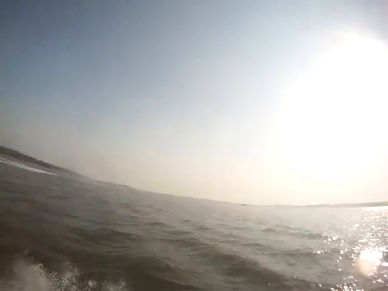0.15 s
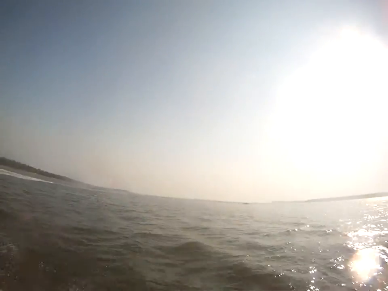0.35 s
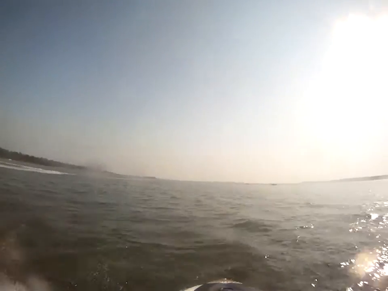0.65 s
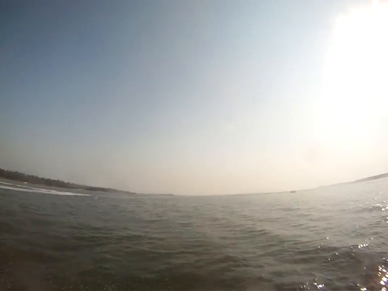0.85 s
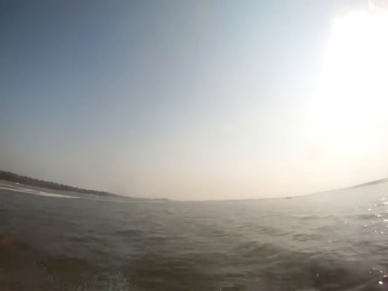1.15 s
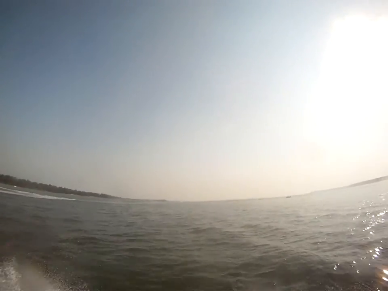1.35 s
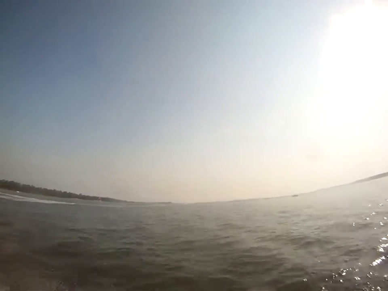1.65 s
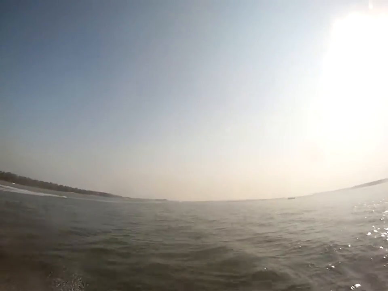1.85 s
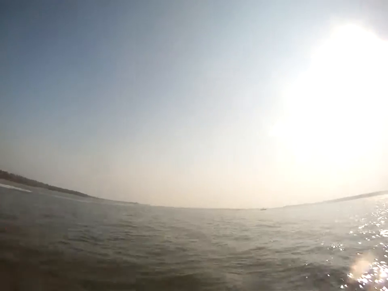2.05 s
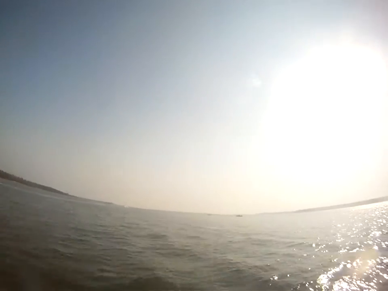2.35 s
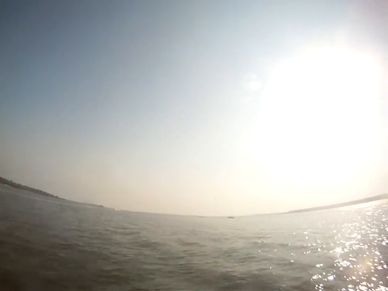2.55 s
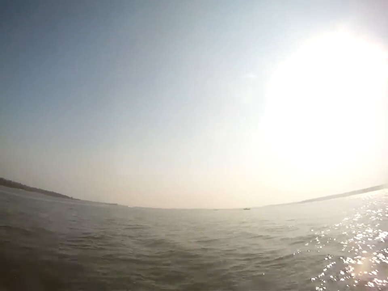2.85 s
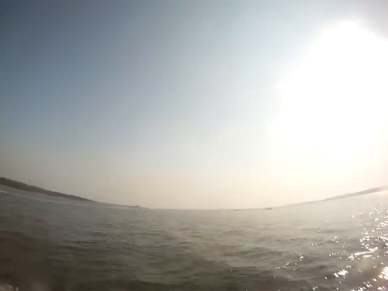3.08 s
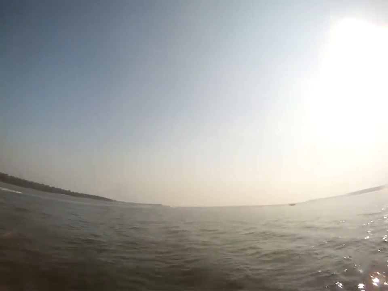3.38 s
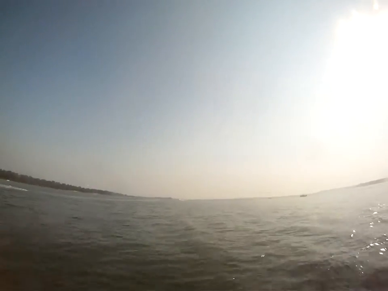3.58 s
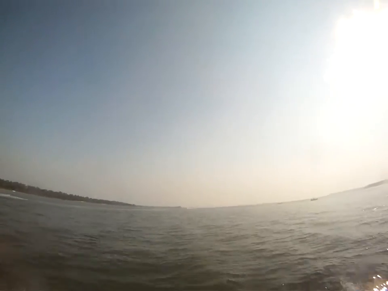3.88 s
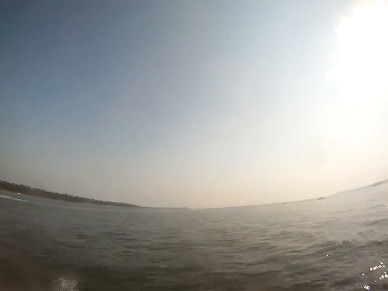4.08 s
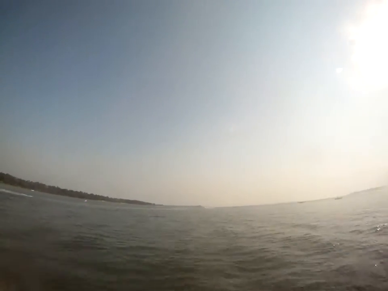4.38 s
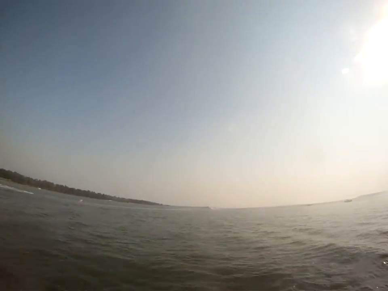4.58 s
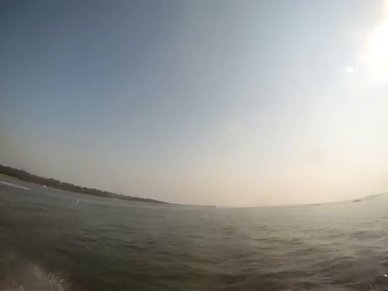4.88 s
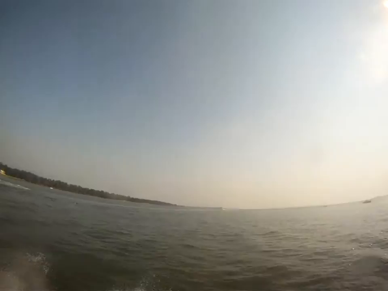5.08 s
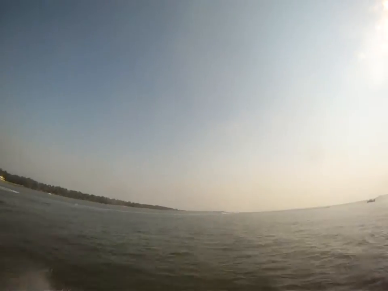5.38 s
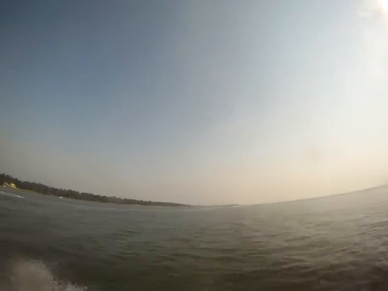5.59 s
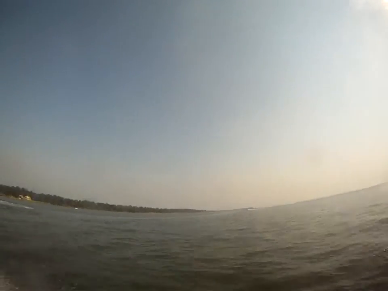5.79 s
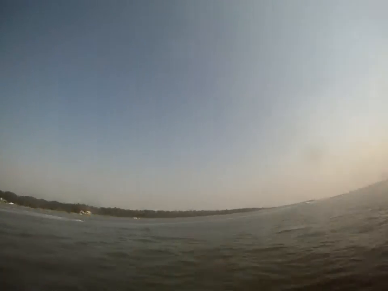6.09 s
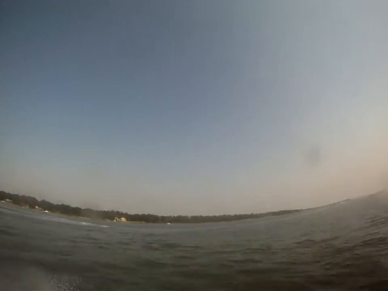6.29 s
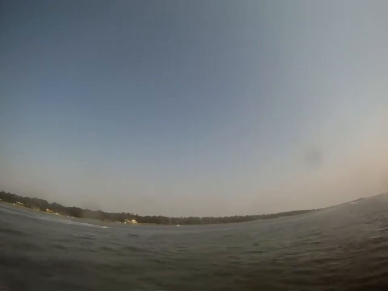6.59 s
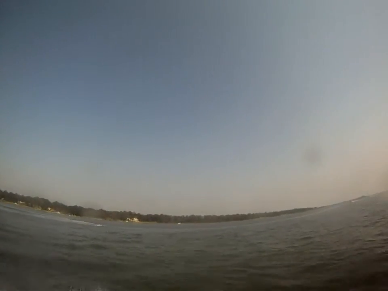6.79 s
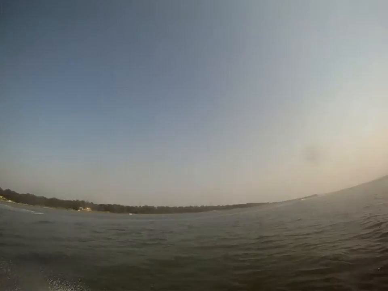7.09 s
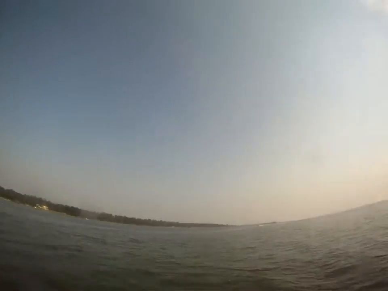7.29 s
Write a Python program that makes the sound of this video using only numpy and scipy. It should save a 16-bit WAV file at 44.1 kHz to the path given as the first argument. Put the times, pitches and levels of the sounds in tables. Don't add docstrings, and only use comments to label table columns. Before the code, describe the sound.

Steady low engine drone aboard a small watercraft on open water, with muffled wave thumps, rushing wash, gritty spray hiss and wind buffeting.

```python
import sys
import numpy as np
from scipy import signal
from scipy.fft import rfft, irfft, next_fast_len
from scipy.io import wavfile

SR = 44100
rng = np.random.default_rng(int(sys.argv[2]) if len(sys.argv) > 2 else 0)


def waveform_to_disk(signal):
    frames = np.transpose(np.atleast_2d(signal))
    scaled = np.clip(frames, -1, 1) * 32767
    samples = np.round(scaled).astype(np.int16)
    wavfile.write(sys.argv[1], SR, samples)


def to_linear_factor(level_db):
    exponent = np.asarray(level_db, float) / 20
    return 10 ** exponent


N = 328104

# time in seconds, firing rate in Hz, hum level in dB.
ENGINE_RUN = [(0, 180.4, -15.5), (.85, 181.7, -16), (1.2, 182.4, -16), (1.9, 181.4, -16.5),
              (2.44, 182, -16.5), (2.73, 192.3, -15.5), (3.04, 198.7, -17.5), (3.68, 198.0, -16),
              (3.8, 200.6, -20), (4.1, 198.5, -17), (4.56, 198.2, -18.8), (5.3, 200, -17),
              (5.52, 199.8, -20), (6.1, 200.2, -17.5), (6.45, 199.2, -13), (6.9, 199.4, -17),
              (7.2, 200.7, -15.5), (7.44, 200.3, -14.5)]
# time of the main push in seconds, peak in dB, pitch in Hz, polarity (1 or -1), gain duck
# in dB.
WAVE_SLAMS = [(.017, -10, 140, 1, 1.5), (.279, -10, 130, -1, 1.2), (.379, -10, 130, -1, 1.2),
              (1.008, -12, 110, -1, 1.2), (1.272, -14, 86, 1, 1.5), (2.730, -11, 70, 1, 1.5),
              (3.281, -11, 110, -1, 1.5), (3.499, -11, 110, -1, 3.0), (3.647, -11, 120, 1, 1.5),
              (3.899, -6, 105, -1, 5.5), (4.221, -5, 115, -1, 6.5), (4.358, -8, 160, 1, 1.5),
              (4.611, -10, 130, 1, 1.2), (5.036, -8, 110, 1, 2.5), (5.465, -7, 70, -1, 5.0),
              (6.167, -9, 140, 1, 1.2), (6.345, -7, 100, -1, 6.5), (6.683, -12, 100, 1, 1.5),
              (6.849, -6, 75, 1, 3.5), (7.024, -11, 75, 1, 2.5), (7.117, -10, 110, -1, 1.2),
              (7.218, -10, 90, 1, 1.2)]


def engine():
    # multiple of the firing rate, level in dB under the hum.
    overtones = [(2, -30), (3, -35)]
    firing_hz, hum_db = in_time(ENGINE_RUN)
    phase = 2 * np.pi * np.cumsum(firing_hz + 0.4 * drift(5.7)) / SR
    tone = np.sin(phase)
    for multiple, level_db in overtones:
        overtone_db = level_db + 2 * housing_db(multiple * firing_hz) + 5.9 * drift(2.8)
        overtone_phase = round(multiple) * phase + 0.62 * drift(3.5)
        tone += to_linear_factor(overtone_db) * np.sin(overtone_phase)
    return np.sqrt(2) * to_linear_factor(hum_db + 0.88 * drift(16.0)) * tone


def slams():
    out, t = np.zeros(N), np.arange(N) / SR
    for s, peak_db, pitch_hz, polarity, duck_db in WAVE_SLAMS:
        near = slice(max(round((s - .03) * SR), 0), round((s + .03) * SR))
        cycles = (t[near] - s) * pitch_hz
        envelope = np.exp(-((cycles - .2) / .55) ** 2)
        out[near] += np.sign(polarity) * to_linear_factor(peak_db) * np.cos(2 * np.pi * cycles) * envelope
    return out


def drumming(faster_hz, keel_db):
    # frequency in Hz, level in dB per Hz.
    spectrum = [(40, -7), (65, -5.5), (90, -0.5), (150, -3), (195, -8.5), (250, -14.5), (350, -25)]
    level_db = -24 + 0.13 * faster_hz + keel_db
    return to_linear_factor(level_db) * turbulence(spectrum, shared_db=-0.2, own_db=0.7, rate=10.0, count=2)


def boom(faster_hz, bow_db, wind_db):
    # frequency in Hz, level in dB per Hz.
    spectrum = [(140, -7), (195, -5), (235, -3.5), (320, -9), (400, -24), (550, -25)]
    level_db = -26 - 0.0035 * faster_hz + bow_db - 0.43 * wind_db
    return to_linear_factor(level_db) * turbulence(spectrum, shared_db=1.7, own_db=1.6, rate=8.6, count=2)


def wash(faster_hz, wake_db, bow_db):
    # frequency in Hz, level in dB per Hz.
    spectrum = [(220, -24), (330, -1.5), (400, -0.3), (560, -3), (680, -8.5), (900, -20.5), (1300, -29.5)]
    level_db = -28 + 0.0685 * faster_hz + 0.59 * wake_db + 0.17 * bow_db
    return to_linear_factor(level_db) * turbulence(spectrum, shared_db=.9, own_db=0.4, rate=8.6, count=3)


def spray(sheet_db, wind_db):
    # frequency in Hz, level in dB per Hz.
    spectrum = [(300, -57), (700, -17), (1000, -10.5), (1520, -10.5), (2500, -6), (3600, -10.5),
                (4250, -16), (5300, -18), (5900, -24), (6600, -38), (7500, -60)]
    level_db = -32 + sheet_db + 0.46 * wind_db
    top_db = 0.55 * wind_db + 0.25 * sheet_db
    hiss = turbulence(spectrum, shared_db=.75, own_db=.45, rate=28.0, count=6, top_db=top_db)
    return to_linear_factor(level_db) * hiss


def buffet(wind_db):
    # frequency in Hz, level in dB per Hz.
    spectrum = [(10, -30), (20, 5), (40, 6.5), (60, 6), (85, 2), (130, -37)]
    return to_linear_factor(-25 + wind_db) * turbulence(spectrum, shared_db=1.7, own_db=0.0, rate=8.8, count=2)


def headwind():
    # time in seconds, strength in dB over calm.
    strength = [(0, 2), (.4, -3), (1.7, 0), (3.0, -1.5), (4.3, 0), (5.0, 1.5), (6.0, 3), (6.9, 4),
                (7.44, 2)]
    return in_time(strength)[0]


def swells():
    # centre in seconds, length in seconds, strength in dB, bow share (0 keel to 1 bow).
    meetings = [(.7, 0.23, 3.5, 0.74), (1.2, .3, 2.5, 0.24), (1.45, .15, 2.2, 1), (1.9, 0.12, 4.9, 0.52),
                (2.7, 0.24, 1.1, .1), (3.25, 0.13, 2.2, .1), (3.6, 0.28, 6.1, .9), (4.1, 0.36, 6.4, 0.34),
                (4.55, 0.42, 7.8, 0.67), (5.0, 0.14, 2.3, 0.41), (5.5, 0.16, 5.8, .05),
                (5.85, 0.16, 2.4, 0.89), (6.25, .2, 1.2, 0.54), (6.8, 0.14, 2.6, .2),
                (7.25, 0.24, 5.6, 0.64)]
    s, length, strength_db, bow = np.transpose(meetings)
    keel_db = bumps(s, length, strength_db * (1 - bow))
    bow_db = bumps(s, length, strength_db * bow)
    return keel_db, bow_db


def sheets():
    # centre in seconds, length in seconds, swing in dB (below zero: hull lifts clear).
    throws = [(0.26, 0.044, 2.5), (0.518, 0.2, 3), (0.817, .07, -1.5), (1.038, 0.13, 2.5),
              (1.144, 0.025, 1.5), (1.225, 0.035, -1.5), (1.343, 0.063, 3.5), (1.657, 0.11, -4),
              (2.2, 0.15, .5), (2.757, 0.053, 2.5), (3.2, 0.16, 2.5), (3.52, 0.13, 3), (3.68, 0.12, 1.5),
              (4.046, 0.25, 2), (4.36, .04, 1.5), (4.6, 0.17, 1.5), (4.805, 0.038, 1.5), (5.0, .05, -0.5),
              (5.127, 0.039, 2.5), (5.293, .15, 1), (5.88, 0.13, 2), (6.102, 0.05, 1), (6.272, .1, 2.5),
              (6.587, 0.15, 2), (6.82, .06, 0.5), (7.1, .1, .5), (7.4, 0.17, 2)]
    s, length, swing_db = np.transpose(throws)
    return bumps(s, length, swing_db), bumps(s, 1.3 * length, swing_db)


def housing_db(hz):
    # centre in Hz, width in Hz, boost in dB.
    modes = [(611, 56, 3), (1205, 140, 1.5), (2260, 500, 1), (2477, 190, -4.5), (3033, 430, 4.5),
             (3290, 310, 2), (3690, 180, -4), (3860, 160, 0.5), (4856, 780, 7)]
    return sum(boost_db / (1 + (2 * (hz - peak_hz) / width) ** 2) for peak_hz, width, boost_db in modes)


def turbulence(spectrum, shared_db, own_db, rate, count, top_db=0):
    size = next_fast_len(N)
    hz = np.maximum(np.arange(size // 2 + 1) * SR / size, 1)
    points = np.array(spectrum)
    colour_db = np.interp(np.log(hz), np.log(points[:, 0]), points[:, 1], left=-90, right=-90)
    noise = rfft(rng.standard_normal(size)) * to_linear_factor(colour_db + housing_db(hz))
    place = np.interp(np.log(hz), np.log(points[[1, -2], 0]), [0, count - 1])
    together, out = drift(rate), np.zeros(N)
    for k in range(count):
        share = np.clip(1 - np.abs(place - k), 0, 1)
        band = irfft(noise * share, size)[:N]
        tilt_db = top_db * (k / (count - 1)) ** 3
        out += band * to_linear_factor(shared_db * together + own_db * drift(rate) + tilt_db)
    return rms_one(out)


def drift(rate):
    r = np.exp(-80 * np.pi * rate / SR)
    noise = rng.standard_normal(N // 40 + 2002)
    slow = signal.lfilter([1], [1, -2 * r, r * r], noise)[2000:]
    return np.interp(np.arange(N) / 40, np.arange(len(slow)), rms_one(slow))


def bumps(s, length, swing_db):
    t = np.arange(0, N + 64, 64) / SR
    total = sum(d * np.exp(-((t - a) / w) ** 2) for a, w, d in zip(s, length, swing_db))
    return np.interp(np.arange(N) / SR, t, total)


def in_time(rows):
    s, *columns = np.transpose(rows)
    return [np.interp(np.arange(N) / SR, s, c) for c in columns]


def rms_one(x):
    return x / np.sqrt(np.mean(x ** 2) + 1e-20)


def scene():
    faster_hz = in_time(ENGINE_RUN)[0] - 181
    wind_db = headwind()
    keel_db, bow_db = swells()
    sheet_db, wake_db = sheets()
    hull = drumming(faster_hz, keel_db) + boom(faster_hz, bow_db, wind_db)
    water = wash(faster_hz, wake_db, bow_db) + spray(sheet_db, wind_db)
    return (engine() + slams() + hull + water + buffet(wind_db))[None]


def gain_control():
    attack_s, release_s = .0015, .14
    t, gain_db = np.arange(N) / SR, np.zeros(N)
    for s, peak_db, pitch_hz, polarity, duck_db in WAVE_SLAMS:
        since = np.maximum(t - s - 3 * attack_s, 0)
        gain_db -= duck_db * (1 - np.exp(-since / attack_s)) * np.exp(-since / release_s)
    return to_linear_factor(gain_db)


def held_samples(x):
    slow = signal.resample_poly(x, 160, 147, axis=1)[:, ::4]
    return signal.resample_poly(np.repeat(slow, 4, axis=1), 147, 160, axis=1)[:, :N]


def band_limit(x):
    return signal.sosfilt(signal.butter(12, 16610, fs=SR, output="sos"), x)


def record(dry):
    held = held_samples(dry * gain_control())
    top_cut = signal.ellip(14, .2, 80, 15270, fs=SR, output="sos")
    mix = signal.sosfilt(top_cut, held)
    return band_limit(mix)


dry = scene()
out = record(dry)
waveform_to_disk(out)
```